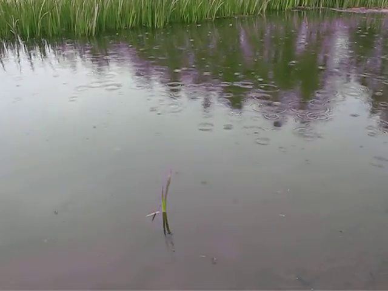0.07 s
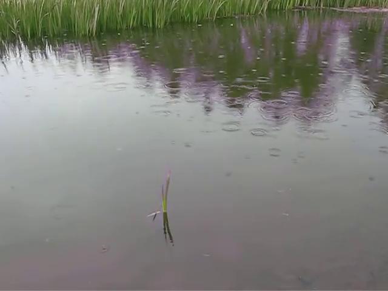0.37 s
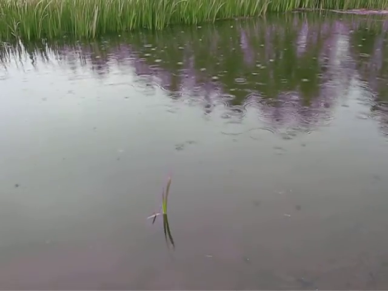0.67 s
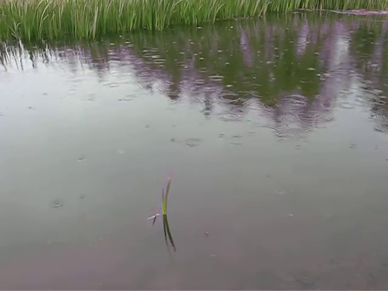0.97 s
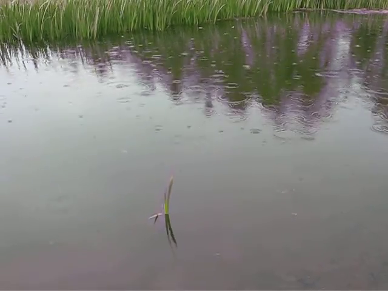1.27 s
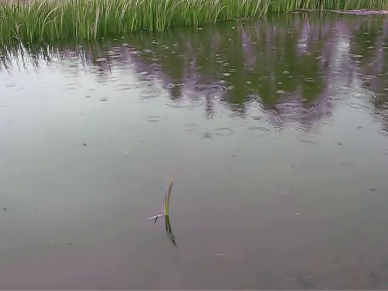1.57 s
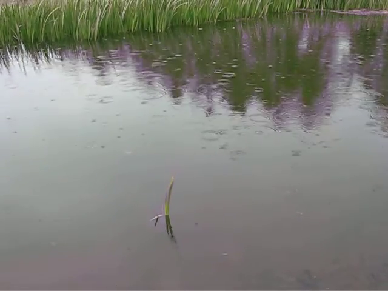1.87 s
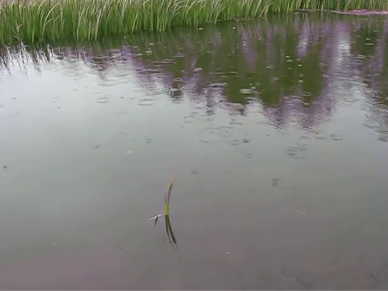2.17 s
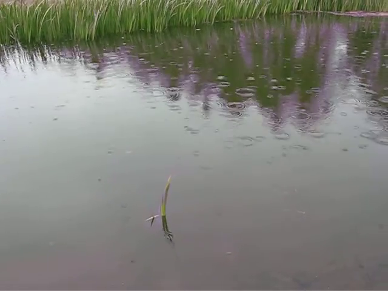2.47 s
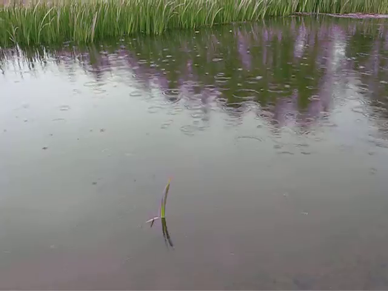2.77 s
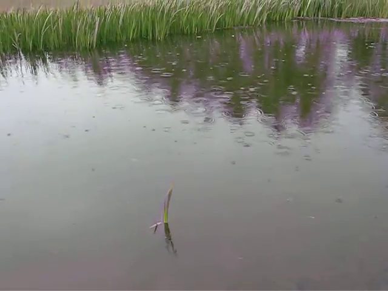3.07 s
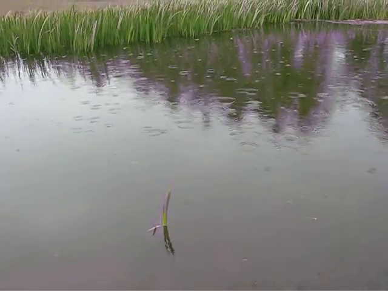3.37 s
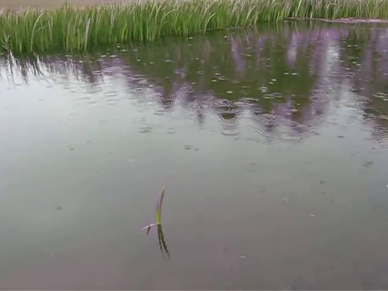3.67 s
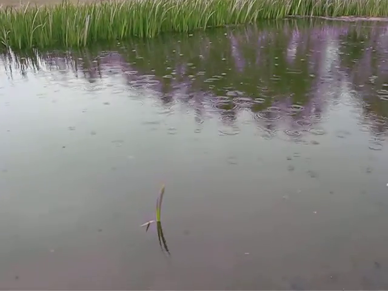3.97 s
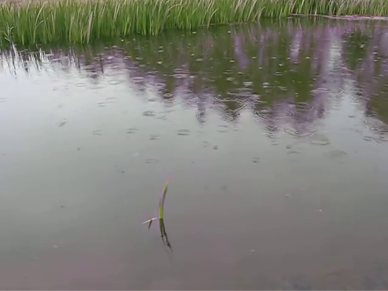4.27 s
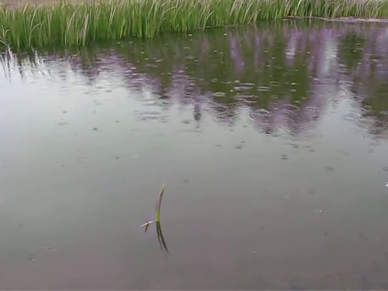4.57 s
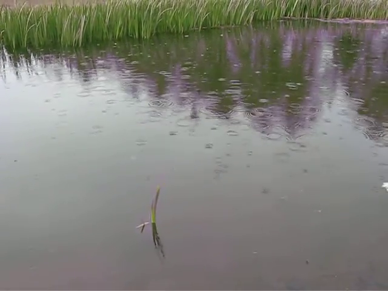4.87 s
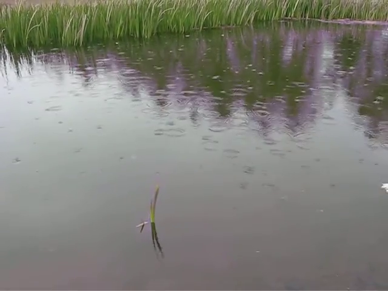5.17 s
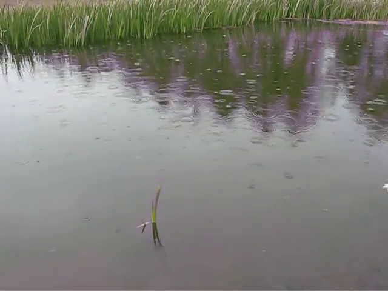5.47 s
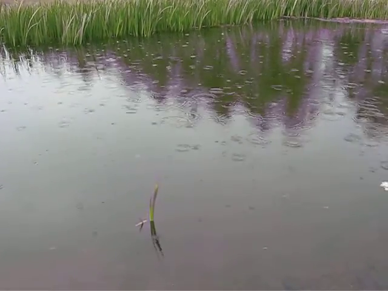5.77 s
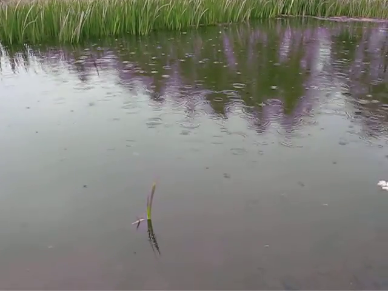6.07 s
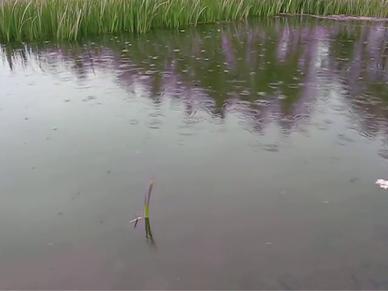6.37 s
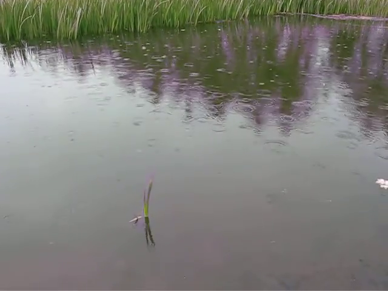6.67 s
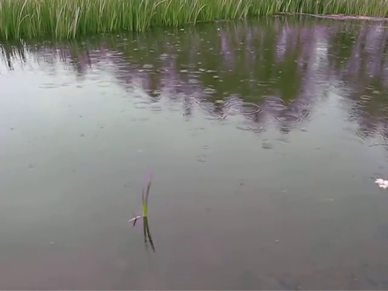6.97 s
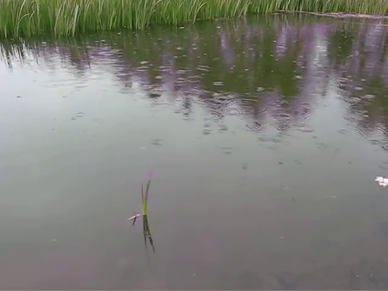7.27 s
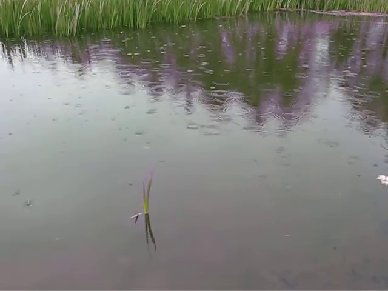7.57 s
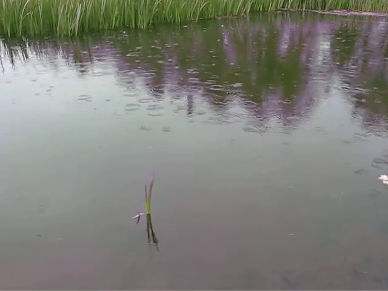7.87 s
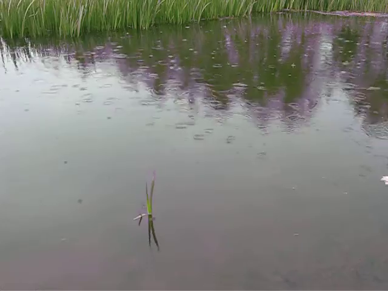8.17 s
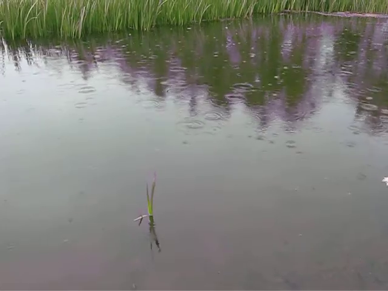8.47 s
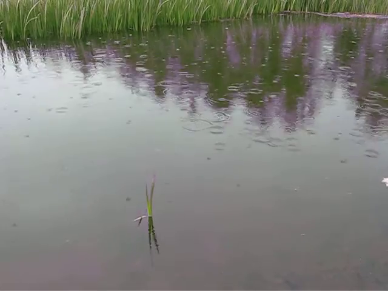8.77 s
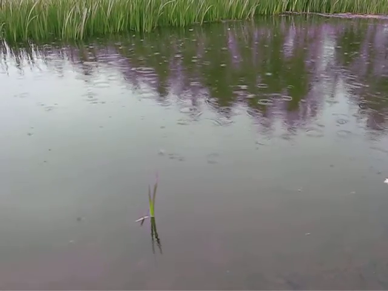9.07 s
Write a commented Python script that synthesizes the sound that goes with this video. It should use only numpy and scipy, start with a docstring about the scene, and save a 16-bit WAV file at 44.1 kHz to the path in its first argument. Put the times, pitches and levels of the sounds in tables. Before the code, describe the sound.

Two toads trill high beside a pond in light rain while gusts of wind buffet the microphone.

```python
"""Two toads trill at a pond, each pulse of air setting their vocal cords ringing; the pulses slide in and
out of step until both stop. Wind buffets the microphone over a far wash of traffic and light rain.
Drops tick nearby and a bird gives a few gliding chirps. Late on, a thin insect buzz throbs with
its wing strokes, a far engine hums and the lower toad starts up again."""
import sys
import numpy as np
from scipy import signal
from scipy.fft import rfft, irfft, next_fast_len
from scipy.io import wavfile

SR = 44100
rng = np.random.default_rng(int(sys.argv[2]) if len(sys.argv) > 2 else 0)


def master(y):
    """Save y as 16-bit WAV."""
    cut = np.clip(np.atleast_2d(y).T, -1, 1)
    pcm = np.round(cut * 32767)  # scale
    wavfile.write(sys.argv[1], SR, pcm.astype(np.int16))


N = 401751
TIME = np.arange(N) / SR
BUFFET_HALF_S = .028  # time from the start of a buffet to its peak

# how strong the wind's rumble is from low to high: pitch_hz, level_db
WIND_SPECTRUM = [(12, -48), (20, -14.5), (58, -3), (124, -0.5), (238, -5.5), (600, -29.5), (780, -23),
                 (1320, -120)]


def amp(db):
    """Turns decibels into a number to multiply by."""
    return 10 ** (np.asarray(db) / 20)


def unit(x):
    """Scales a signal to an average strength (rms) of 1."""
    return x / np.sqrt(np.mean(x ** 2) + 1e-20)


def follow(rows, t=TIME):
    """Reads each column of a table at the times t, joining its rows with straight lines."""
    times, *columns = np.transpose(rows)
    return [np.interp(t, times, column) for column in columns]


def add(mix, start_s, sound):
    """Mixes a sound in from start_s, cutting off what does not fit."""
    start = int(round(start_s * SR))
    part = mix[max(start, 0):][:max(len(sound) + min(start, 0), 0)]
    part += sound[max(-start, 0):][:len(part)]


def colour(x, points):
    """Shapes the bass and treble of x along (pitch_hz, level_db) points; the result has strength 1."""
    hz, db = np.transpose(points)
    size = next_fast_len(len(x))
    gain = amp(np.interp(np.log(np.fft.rfftfreq(size, 1 / SR) + 1), np.log(hz), db))
    return unit(irfft(rfft(x, size) * gain, size)[:len(x)])


def drift(hz):
    """A random wobble no faster than about hz."""
    size = next_fast_len(N)
    freqs = np.fft.rfftfreq(size, 1 / SR)
    return unit(irfft(rfft(rng.standard_normal(size)) / (1 + (freqs / hz) ** 4), size)[:N])


def ring(x, hz, width_hz):
    """Makes x ring briefly around one pitch."""
    return signal.lfilter(*signal.iirpeak(hz, hz / width_hz, fs=SR), x)


def trill(rates, voice, start_turn, droop, fall_s, second_db, third_db):
    """Each pulse of air starts a toad's vocal cords afresh; the pitch droops as the pressure runs out."""
    t = np.arange(rates[0][0], rates[-1][0], 1 / SR)
    turns = start_turn + np.cumsum(follow(rates, t)[0]) / SR
    centres = np.interp(np.arange(np.ceil(turns[0]), turns[-1]), turns, t)
    peak_db, pitch = follow(voice, centres)[:2]
    lengths = follow(voice, centres)[2]
    # no two pulses are alike in timing, strength or pitch
    late, loud, sharp = rng.standard_normal((len(centres), 3)).T
    centres = centres + signal.lfilter([1], [1, -.7], .00014 * late)
    peak_db, pitch = peak_db + .45 * loud, pitch * (1 + .008 * sharp)
    shake, out = 1 + .06 * drift(260), np.zeros(N)
    for centre, db, hz, length in zip(centres, peak_db, pitch, lengths):
        at = np.arange(max(int((centre - length / 2) * SR), 0), min(int((centre + length / 2) * SR), N))
        progress = np.clip((TIME[at] - centre) / length + .5, 0, 1)
        # pulses die away in about the same time, so a longer one swells more gently
        peak_at = np.clip(1 - fall_s / length, .2, .6)
        swell = np.sin(np.pi / 2 * np.minimum(progress / peak_at, (1 - progress) / (1 - peak_at))) ** 1.02
        # the pitch scoops up from 8% below, then sags
        scoop_span = .35 * peak_at
        scoop = .08 * scoop_span * np.exp(-progress / scoop_span)
        sag = droop * progress ** 3.51 / 3.51
        phase = 2 * np.pi * hz * length * (progress - sag + scoop)
        # overtones appear only where the cords are driven hard
        overtones = swell ** 2 * (amp(second_db) * np.sin(2 * phase) + amp(third_db) * np.sin(3 * phase))
        out[at] += amp(db) * swell * shake[at] * (np.sin(phase) + overtones)
    return out


def toads():
    """A high and a low toad trill, slowing as they tire; later the low one starts again."""
    # how fast each trill pulses: time_s, pulses_per_s
    high_rate = [(0, 47.2), (.4, 45.4), (1.8, 43.8), (2.8, 43.96), (3.8, 42), (4.8, 41.74), (5.2, 40),
                 (5.65, 41.72), (5.86, 36.1)]
    low_rate = [(0, 54.46), (.8, 50.52), (1.3, 48.87), (2.3, 46.75), (2.8, 46.4), (3.8, 45.04),
                (4.3, 45.16), (5.2, 43.62), (5.4, 36)]
    again_rate = [(8.85, 55.5), (9.11, 56)]
    # the voice of each trill: time_s, level_db, pitch_hz, pulse_length_s
    high_voice = [(0, -12.4, 2015, .018), (.7, -13.3, 2030, .0185), (1.62, -14.7, 2012, .0165),
                  (2.26, -12.7, 1966, .0125), (3.3, -12.7, 1966, .0115), (4.48, -12.2, 1948, .0118),
                  (5.3, -11, 1958, .0128), (5.85, -10.2, 1966, .0135)]
    low_voice = [(0, -30, 1450, 0.003), (.25, -21, 1660, 0.011), (.6, -15.5, 1782, .014),
                 (1.5, -13.5, 1778, .012), (3, -14.5, 1764, .016), (5.4, -14, 1751, .012)]
    again_voice = [(8.85, -36, 1560, 0.012), (8.97, -29.5, 1680, 0.011), (9.11, -24.5, 1735, 0.016)]
    # where in its pulse cycle each trill begins: high_cycles, low_cycles, again_cycles
    starts = (-.06, .4, .05)
    high = trill(high_rate, high_voice, starts[0], droop=.22, fall_s=.01, second_db=-31.7, third_db=-42)
    low = trill(low_rate, low_voice, starts[1], droop=.13, fall_s=.011, second_db=-31, third_db=-69)
    again = trill(again_rate, again_voice, starts[2], droop=.1, fall_s=.006, second_db=-36, third_db=-50)
    return high + low + again


def bank_echoes(x, fade_s=.22, count=900):
    """Reeds and banks scatter many faint echoes back over the water."""
    delay_s = rng.uniform(.004, .3, count)
    echoes = np.zeros(SR)
    echoes[(delay_s * SR).astype(int)] = rng.choice([-1, 1], count) * amp(-60 * delay_s / fade_s)
    return signal.fftconvolve(x, echoes / np.linalg.norm(echoes))[:N]


def gust(start, length, db, hz, rise_s=.055, fall_s=.059, breeze_hz=124):
    """A rumble that builds, holds and dies away; faster air rumbles higher."""
    fade = np.maximum((start - TIME) / rise_s, (TIME - start - length) / fall_s)
    at, out = fade < 10, np.zeros(N)
    rumble = colour(rng.standard_normal(N)[at], np.multiply(WIND_SPECTRUM, [hz / breeze_hz, 1]))
    out[at] = amp(db) * np.exp(-np.maximum(fade[at], 0)) * rumble
    return out


def buffet(strength_db):
    """A swirl of air strikes the microphone: a short churn with a kick of pressure in the middle."""
    edge_hz = min(770 * 2 ** (strength_db / 19), SR / 10)  # a harder hit is brighter
    size = int(2 * BUFFET_HALF_S * SR)
    band = np.vstack([signal.butter(2, [edge_hz / 6.53, edge_hz], "bandpass", fs=SR, output="sos"),
                      signal.butter(2, 2 * edge_hz, fs=SR, output="sos")])
    churn = signal.sosfilt(band, rng.standard_normal(SR // 2))[-size:] * np.hanning(size) ** 2
    from_peak = (np.arange(size) / SR - BUFFET_HALF_S) * edge_hz * 1.5
    kick = (1 - 2 * from_peak ** 2) * np.exp(-from_peak ** 2)
    return amp(strength_db - 7) * (amp(3) * kick + amp(-6) * unit(churn))


def wind(breeze_db=-38, lumps_db=2, swirls_per_s=14, peak_delay_s=.0047):
    """Lumpy gusts blow over a steady breeze, and swirls of air in them hit as buffets."""
    # gusts at the microphone: start_s, length_s, level_db, pitch_hz
    gusts = [(0, 0.11, -24.5, 116), (0.216, .24, -23.5, 128), (0.541, 0.61, -29, 120),
             (1.09, 0.49, -23.5, 144), (1.676, 1.0, -26.5, 138), (2.914, 0.9, -27, 124),
             (4.024, .14, -24.5, 121), (4.212, 0.095, -25, 238), (4.512, 0.32, -30.5, 105),
             (5.062, 0.422, -31, 70), (6.261, 0.027, -23.5, 189), (6.539, .1, -24, 214),
             (6.997, .29, -27.5, 130.5)]
    # the hardest buffets: time_s, strength_db
    hard_buffets = [(1.251, -16), (1.308, -13.5), (1.423, -10.5), (1.549, -11.5), (1.697, -11.5),
                    (2.682, -18), (3.415, -16.5), (3.519, -19), (4.236, -10), (4.268, -10), (4.302, -13.5),
                    (4.532, -17), (4.757, -19), (5.109, -14.5), (6.265, -18.5), (6.602, -8), (6.625, -11.5),
                    (6.693, -12.5)]
    breeze = amp(breeze_db) * colour(rng.standard_normal(N), WIND_SPECTRUM)
    air = breeze + sum(gust(*row) for row in gusts)
    out = air * unit(amp(lumps_db * drift(40)))
    for time_s, db in hard_buffets:
        add(out, time_s + peak_delay_s - BUFFET_HALF_S, buffet(db))
    # small swirls ride on the gusts at random
    for start, length, db, _ in gusts:
        for place, strength in rng.random((round(swirls_per_s * length), 2)):
            add(out, start + place * length - BUFFET_HALF_S, buffet(db - 2 + 7 * strength))
    return out


def far_wash():
    """Far traffic and rain on the fields blend into one gently wavering noise."""
    # its strength from low to high: pitch_hz, level_db
    spectrum = [(18, -40), (35, -11), (65, 12), (120, 2.5), (220, 1), (330, -3.5), (480, -4), (900, 1),
                (1500, -2), (2000, -6), (2400, -9), (3780, -17), (5600, -24), (9000, -29)]
    # its loudness: time_s, level_db
    levels = [(0, -34.5), (2, -35), (4, -36.5), (5.6, -37), (6, -33.5), (7.5, -33), (9.11, -32.5)]
    return colour(rng.standard_normal(N), spectrum) * amp(follow(levels)[0] + drift(27))


def rain(drops_per_s=90, spray_s=.0011):
    """Small drops spit briefly on the water, some duller and some brighter, over a flickering hiss."""
    # the strength of the hiss from low to high: pitch_hz, level_db
    spectrum = [(3000, -17.5), (4500, 5.5), (5800, 4.5), (7500, -2.5), (9800, 2), (12500, -1), (14800, -1),
                (15800, -27)]
    # its loudness: time_s, level_db
    levels = [(0, -49.5), (.69, -51.5), (4.1, -49), (4.3, -54.5), (5.4, -56), (5.94, -50.5), (8.75, -49.5),
              (9.11, -52.5)]
    patter = np.zeros(N)
    for hz in (4800, 9000, 12500):
        sizes = amp(4.6 * np.minimum(rng.exponential(1, N), 3.1))
        lands = rng.random(N) < drops_per_s / 3 / SR
        spray_power = signal.lfilter([1], [1, -np.exp(-1 / (spray_s * SR))], (sizes * lands) ** 2)
        patter += ring(np.sqrt(spray_power) * rng.standard_normal(N), hz, width_hz=7000)
    hiss = colour(rng.standard_normal(N) + amp(-4.5) * unit(patter), spectrum)
    flicker_db = .6 * drift(40) + .75 * drift(9)
    return hiss * amp(follow(levels)[0] + flicker_db)


def near_drops(fade_s=.009, splash_db=-6, boost_db=1):
    """A near drop is a sharp tick of spray with one short ring."""
    # drops landing close by: start_s, peak_db (before the boost), pitch_hz
    drops = [(1.804, -32, 11480), (3.382, -28, 8600), (4.064, -23.5, 7540), (6.025, -21, 4403),
             (7.393, -26.5, 4190), (7.685, -29, 10500), (8.246, -29, 9050), (8.679, -24, 5600)]
    t, out = np.arange(SR // 20) / SR, np.zeros(N)
    for start, db, hz in drops:
        spray = rng.standard_normal(len(t)) * amp(-60 * t / fade_s)
        splash = amp(splash_db) * unit(np.diff(spray, prepend=0))
        tick = unit(ring(spray, hz, width_hz=1100)) + splash
        add(out, start, amp(db + boost_db) * tick / abs(tick).max())
    return out


def whistle(t, hz, db, rough, width_hz, fade_s):
    """A tone, partly broken up into a rasp, that fades in and out."""
    rasp = (drift(width_hz) + 1j * drift(width_hz))[:len(t)]
    phase = 2 * np.pi * np.cumsum(hz * np.ones(len(t))) / SR
    tone = ((1 - rough) * np.sqrt(2) + rough * rasp) * np.exp(1j * phase)
    return unit(tone.real) * amp(db) * signal.windows.tukey(len(t), 2 * fade_s / t[-1])


def bird(boost_db=1, rasp_hz=670):
    """A bird across the pond chirps in short glides, each arching a little in pitch."""
    # chirps: start_s, length_s, first_pitch_hz, last_pitch_hz, level_db (before the boost), roughness (0-1)
    chirps = [(2.102, .036, 4500, 4050, -39, .45), (2.133, .024, 3150, 4400, -42, .35),
              (2.158, .04, 2950, 3900, -42, .35), (4.107, .046, 3350, 2800, -37, .85),
              (9.0, .09, 2950, 2620, -47, .12)]
    out = np.zeros(N)
    for start, length, first_hz, last_hz, db, rough in chirps:
        t = np.arange(0, length, 1 / SR)
        glide_hz = first_hz + (last_hz - first_hz) * t / length
        arch = 1 + .03114 * np.sin(np.pi * t / length)
        add(out, start, whistle(t, glide_hz * arch, db + boost_db, rough, rough * rasp_hz, length / 2))
    return out


def insect(cut_db=1, strokes_per_s=56):
    """A thin high buzz comes in bouts, throbbing with each wing stroke."""
    # bouts of buzzing: start_s, length_s, level_db (before the cut)
    bouts = [(7.03, .94, -48.5), (7.88, .62, -50), (8.5, .4, -51), (8.84, .36, -45)]
    out = np.zeros(N)
    for start, length, db in bouts:
        t = np.arange(0, length, 1 / SR)
        hz = 6278 + 9 * (db + 52)  # the pitch rises with effort
        add(out, start, whistle(t, hz, db - cut_db, rough=.68, width_hz=110, fade_s=.1))
    strokes = np.cumsum(strokes_per_s * (1 + .2 * drift(15))) / SR
    return out * unit(1 + .45 * np.sin(2 * np.pi * strokes))


def engine():
    """A far engine speeds up and eases off, its low hum wavering on the air."""
    # its speed and loudness: time_s, cycles_per_s, level_db
    running = [(8.1, 22.5, -57), (8.45, 25.7, -39.5), (8.75, 27.3, -36), (9.11, 24.6, -41)]
    # the tones in its hum: multiple (of the cycle rate), relative_level_db
    tones = [(3, -9), (5, 4), (8, -2.5), (10, -14)]
    hz, db = follow(running)
    turns = np.cumsum(hz * (1 + .00684 * drift(7.5))) / SR
    hum = sum(amp(tone_db) * np.sin(2 * np.pi * multiple * turns) for multiple, tone_db in tones)
    return unit(hum) * amp(db) * (TIME > running[0][0])


def scene():
    """Mixes the toads, the bird and their echoes with the insect, the engine and the weather."""
    trills, chirps = toads(), bird()
    calls = trills + chirps + bank_echoes(amp(-18.5) * trills + amp(-10) * chirps)
    return (calls + insect() + engine() + far_wash() + rain() + near_drops() + wind())[None]


def record(dry):
    """Fades the sound in over 5 ms and takes off the highest treble."""
    faded_in = dry * np.minimum(TIME / .005, 1)
    treble_cut = signal.firwin(511, cutoff=15800, window=("kaiser", 9), fs=SR)
    return signal.oaconvolve(faded_in, treble_cut[None], "same")


dry = scene()
out = record(dry)
master(out)
```